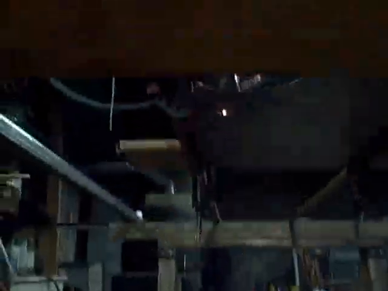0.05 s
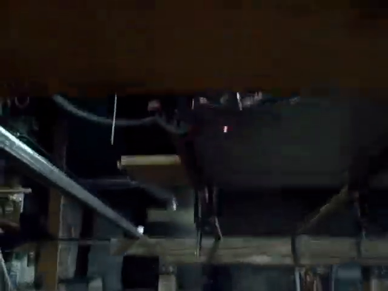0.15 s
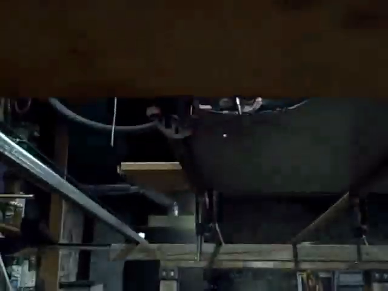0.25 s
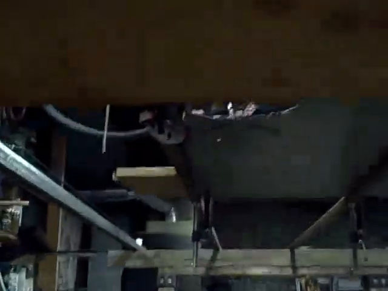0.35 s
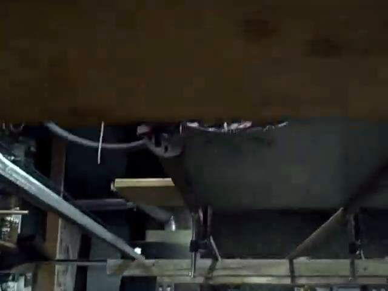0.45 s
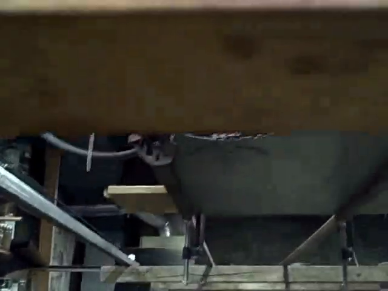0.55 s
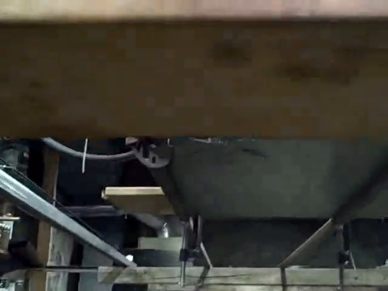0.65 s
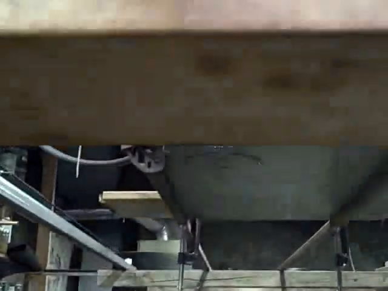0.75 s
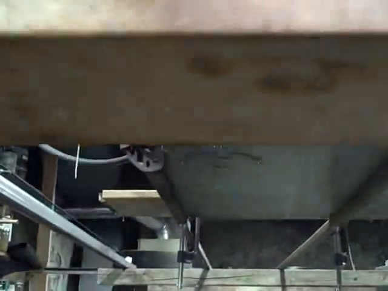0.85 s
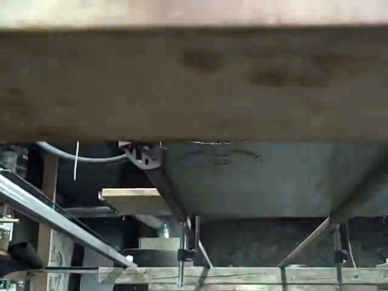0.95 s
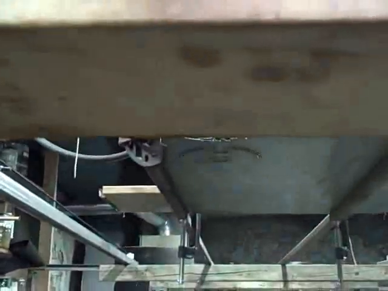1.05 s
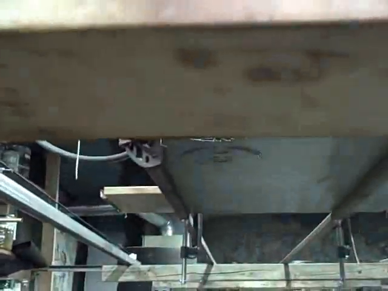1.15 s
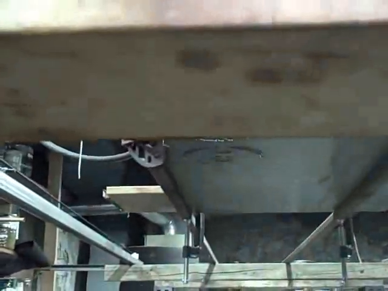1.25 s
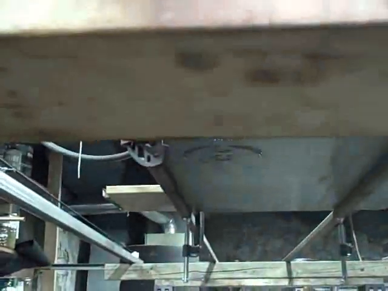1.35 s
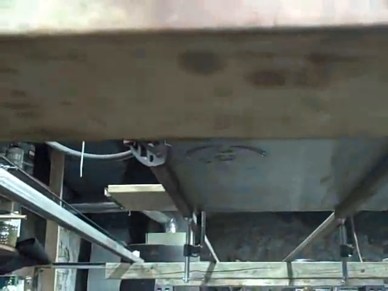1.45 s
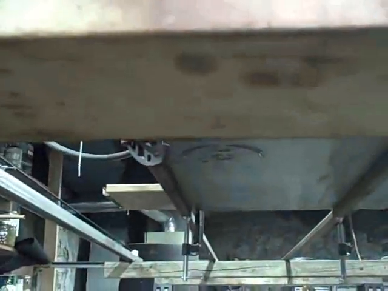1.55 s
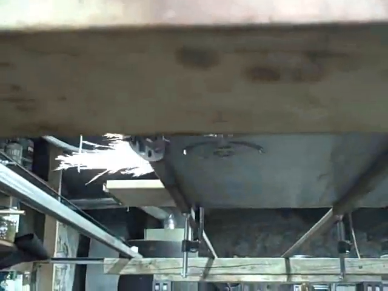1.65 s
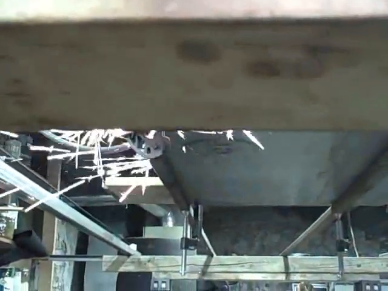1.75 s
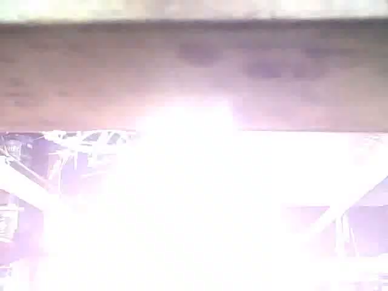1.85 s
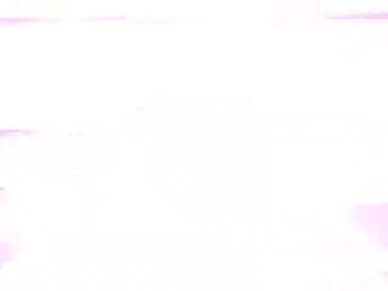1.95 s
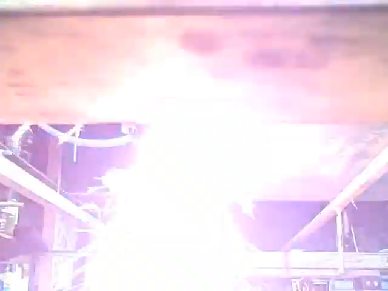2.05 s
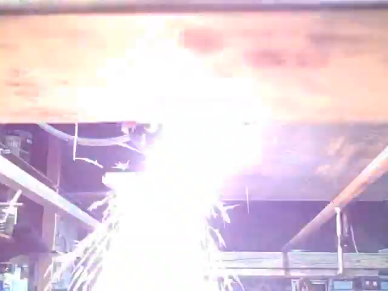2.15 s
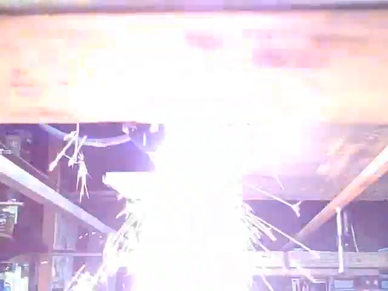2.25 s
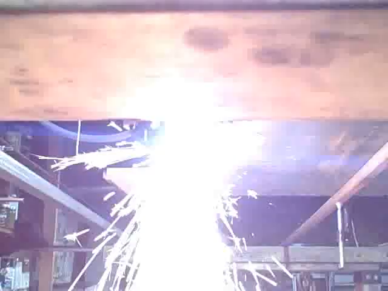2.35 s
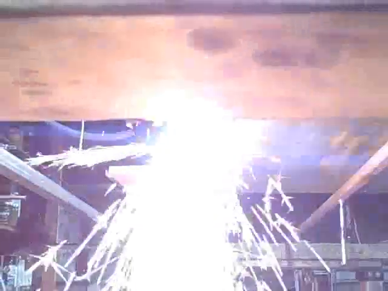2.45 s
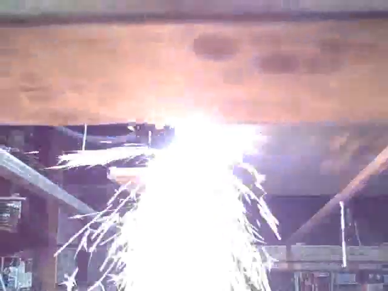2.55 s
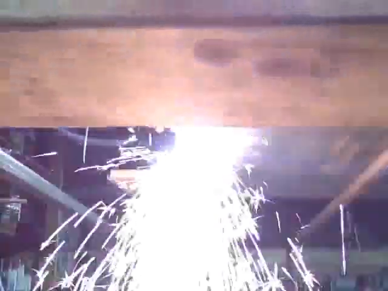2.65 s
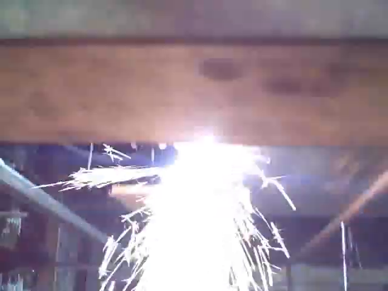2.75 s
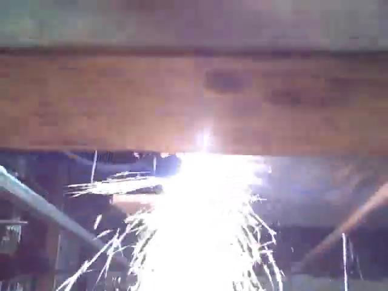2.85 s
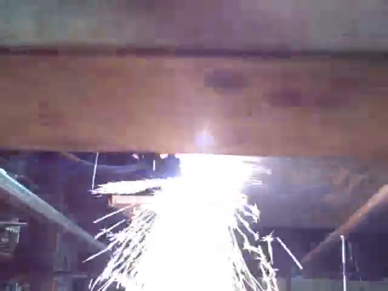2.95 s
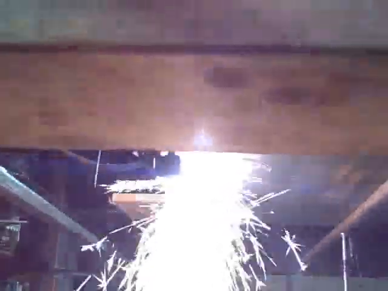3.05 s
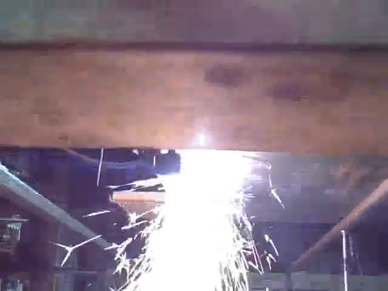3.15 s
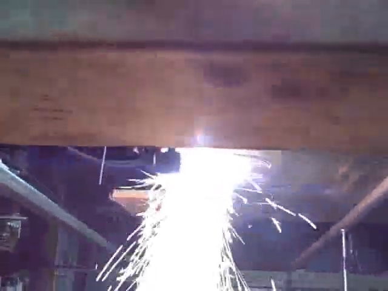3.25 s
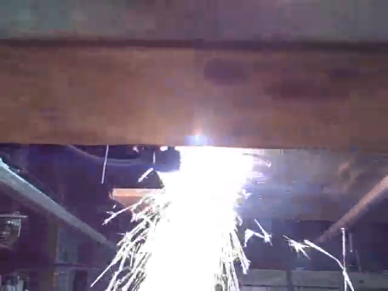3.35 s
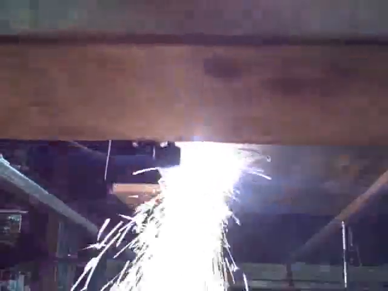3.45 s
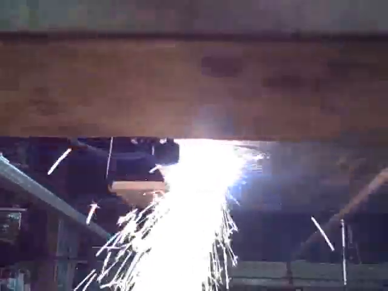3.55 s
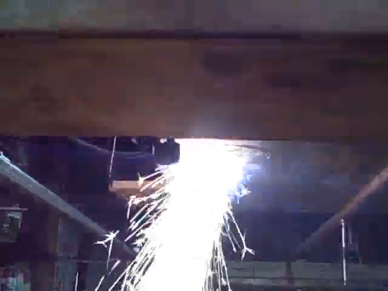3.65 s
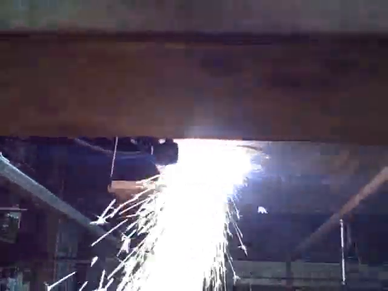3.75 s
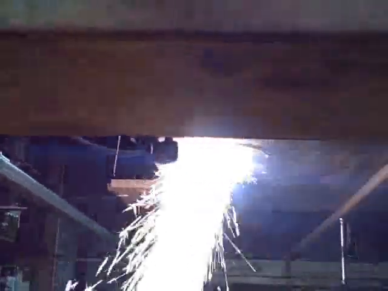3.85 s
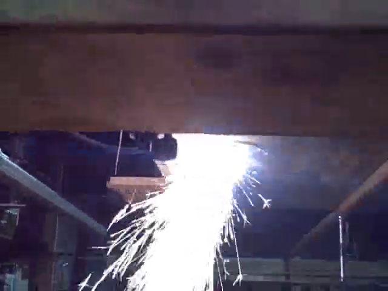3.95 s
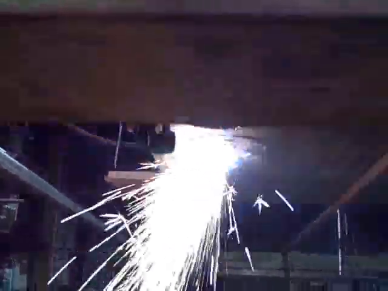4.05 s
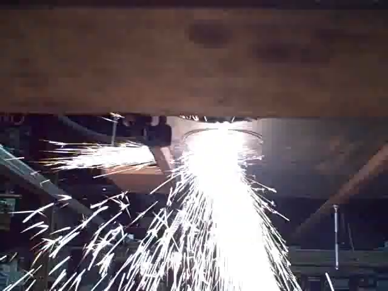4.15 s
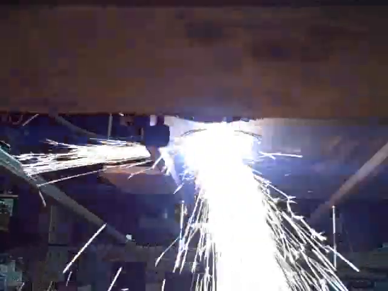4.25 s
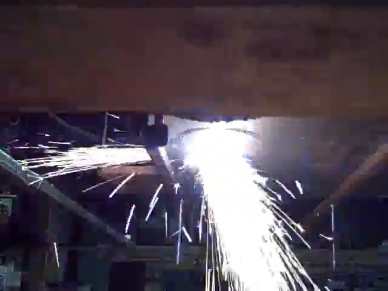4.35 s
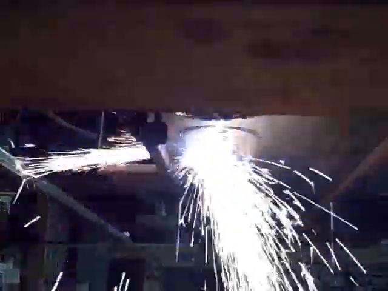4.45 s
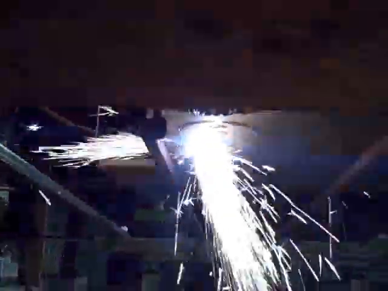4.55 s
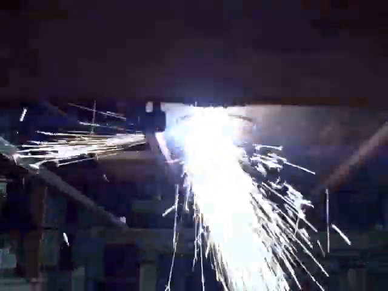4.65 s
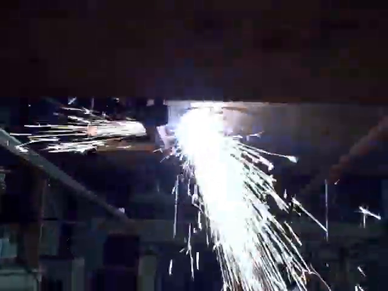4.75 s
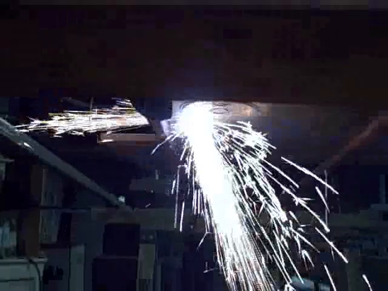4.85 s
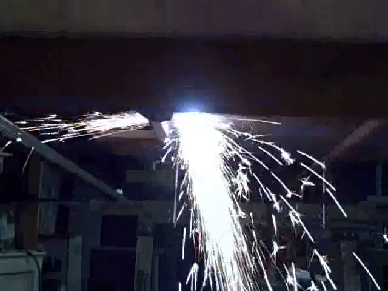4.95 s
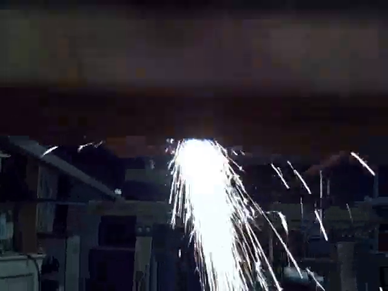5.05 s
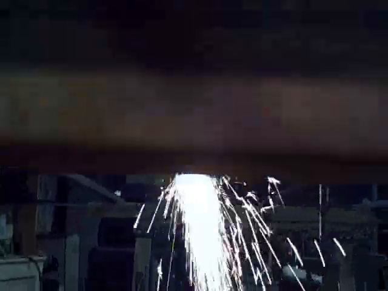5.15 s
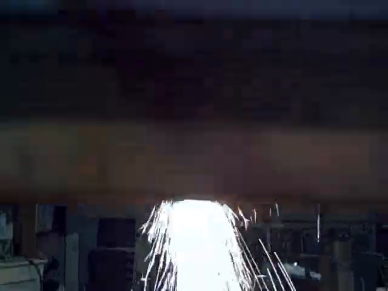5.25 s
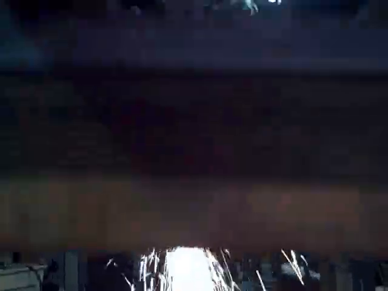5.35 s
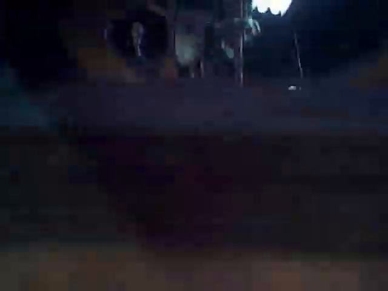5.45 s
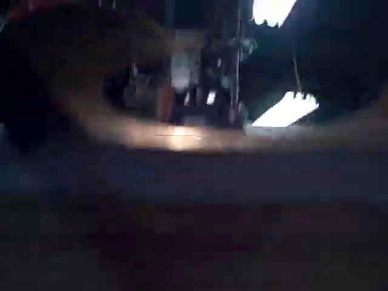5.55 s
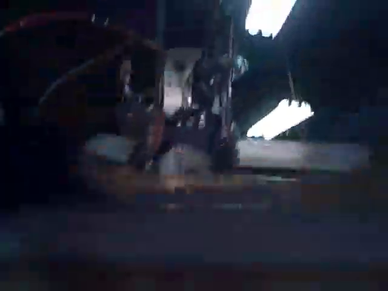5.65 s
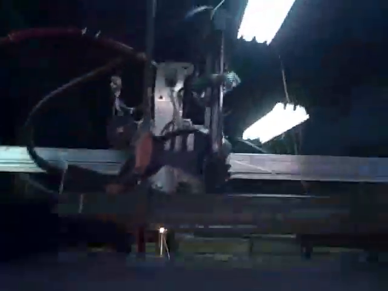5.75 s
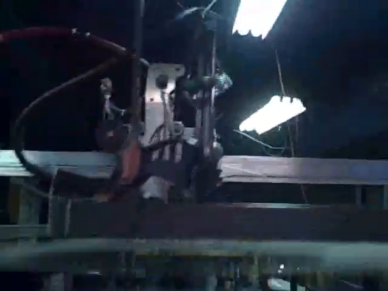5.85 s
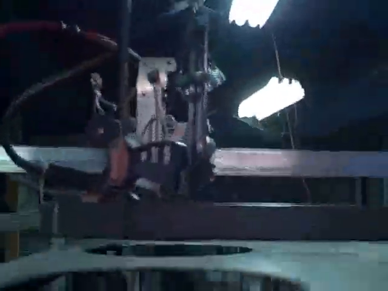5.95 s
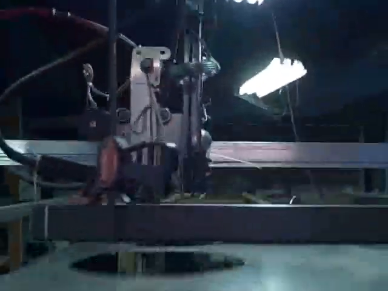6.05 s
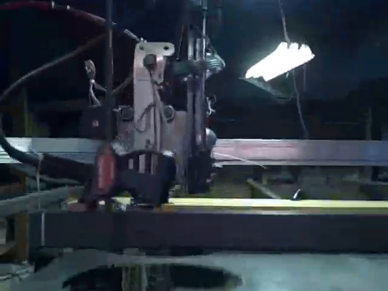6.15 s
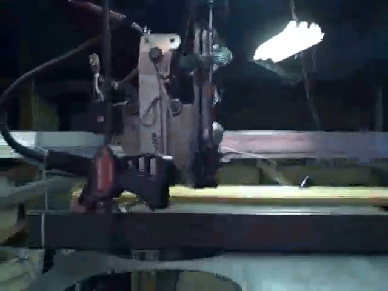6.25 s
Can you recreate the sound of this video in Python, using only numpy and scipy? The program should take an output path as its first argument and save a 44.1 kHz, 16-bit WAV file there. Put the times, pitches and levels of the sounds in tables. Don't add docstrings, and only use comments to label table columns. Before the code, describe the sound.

Compressed air hisses from an idle torch, dips, then a plasma arc strikes and roars harshly through sheet steel, with bumps on the microphone.

```python
import sys
import numpy as np
from scipy import signal
from scipy.fft import rfft, irfft, next_fast_len
from scipy.io import wavfile
from scipy.ndimage import uniform_filter1d

SR = 44100
rng = np.random.default_rng(int(sys.argv[2]) if len(sys.argv) > 2 else 0)


def voltage_ratio(level):
    return 10 ** (np.asarray(level, float) / 20)


def transcribe(u):
    v = np.clip(np.atleast_2d(u).T, -1, 1)
    q = np.round(v * 32767).astype(np.int16)
    wavfile.write(sys.argv[1], SR, q)


N = 278271

ROAR_HZ, BRIGHT_HZ = 1400, 4050
EDGE_HZ, TOP_HZ, END_HZ = 6000, 6375, 7300
CRUISE_DB = -30


def in_time(rows):
    s, *columns = np.transpose(rows)
    return [np.interp(np.arange(N) / SR, s, column) for column in columns]


def rms_one(x):
    return x / np.sqrt(np.mean(x ** 2) + 1e-20)


def shaped(x, points):
    hz, db = np.transpose(points)
    size = next_fast_len(N)
    bins = np.maximum(np.arange(size // 2 + 1) * SR / size, 1)
    gain = voltage_ratio(np.interp(np.log(bins), np.log(hz), db))
    return irfft(rfft(x, size) * gain, size)[:N]


def band(x, low_hz, high_hz):
    return shaped(x, [(low_hz - 1, -150), (low_hz, 0), (high_hz, 0), (high_hz + 1, -150)])


def drift(rate):
    r = np.exp(-80 * np.pi * rate / SR)
    white = rng.standard_normal(N // 40 + 2002)
    slow = signal.lfilter([1], [1, -2 * r, r * r], white)[2000:]
    return np.interp(np.arange(N) / 40, np.arange(len(slow)), rms_one(slow))


def gate(rows, fade_s):
    out = np.zeros(N)
    for s, length, *db in rows:
        start, end = max(round(s * SR), 0), round((s + length) * SR)
        out[start:end] = voltage_ratio(sum(db))
    fade = np.hanning(round(fade_s * SR))
    return signal.fftconvolve(out, fade / fade.sum(), "same")


def ringing(modes, swell_db):
    out, white = np.zeros(N), rng.standard_normal(N)
    for hz, width_hz, db in modes:
        r = np.exp(-np.pi * width_hz / SR)
        tone = signal.lfilter([1, 0, -1], [1, -2 * r * np.cos(2 * np.pi * hz / SR), r * r], white)
        out += voltage_ratio(db + swell_db * drift(2.1)) * rms_one(tone)
    return out


# (time [s], jet level [dB], brightness against the jet [dB])
TORCH_COURSE = [(0.0, -41, 7.5), (0.17, -44.5, 8.5), (0.55, -38, 6), (1.0, -39, 5.5), (1.335, -39, 7.5),
                (1.365, -32.5, 8.5), (1.475, -39, 12.5), (1.495, -45.5, 2), (1.56, -50, 8),
                (1.62, -41, -0.5), (1.71, -47, 6.5), (1.765, -42.5, 8.5), (1.785, -34.5, 5.5),
                (1.9, -32, 12.5), (2.0, -26.5, 10), (2.3, -22, 5.5), (2.9, -25.5, 5.5), (4.0, -27, 6),
                (5.1, -30, 4.5), (5.7, -27.5, 5), (5.84, -29.5, 9.5), (5.91, -35.5, 8.5), (6.03, -38, 10.5),
                (6.31, -34.5, 9)]
# (time [s], level [dB])
JET_MOMENTS = [(2.08, 0), (2.131, 3), (2.19, 0.5), (2.26, 3), (2.304, -3), (2.379, -7.5), (2.468, 2.5),
               (2.503, -3.5), (2.56, -2.5), (2.63, 3), (2.68, -1), (2.729, -5), (2.842, -1), (2.918, -2),
               (3.07, 1), (3.16, 1), (3.217, -1), (3.55, -0.5), (3.799, -4.5), (3.999, -4), (4.051, 3),
               (4.42, 1.5), (4.483, -0.5), (4.57, -1), (4.63, -2), (4.67, 1), (4.709, -4.5), (4.75, 2.5),
               (4.802, -2), (4.83, 2), (4.932, 0.5), (5.11, -2), (5.249, -0.5), (5.318, -6), (5.621, 4.5),
               (5.69, 6), (5.75, 2.5), (5.82, 3), (6.17, -2), (6.222, 1)]
# (time [s], level [dB])
KERF_OPENING = [(0, -5.5), (1.0, -3), (1.5, -1.6), (1.9, 0.1), (2.2, -2), (2.55, -1), (2.8, -1), (3.3, 2.1),
                (3.7, 1.5), (4.3, 0.5), (4.6, 0.4), (4.95, -0.2), (5.3, 1.5), (5.55, 0.8), (5.69, 3),
                (5.8, 1.5), (6.31, -1.5)]


def torch_levels():
    steady_db, bright_db = in_time(TORCH_COURSE)
    t = np.arange(N) / SR
    coarse = t[::32]
    moment_s = 0.014
    moments = sum(db * np.exp(-.5 * ((coarse - s) / moment_s) ** 2) for s, db in JET_MOMENTS)
    surges_per_s = 14
    surge_db = np.interp(t, coarse, moments) + 0.6 * drift(surges_per_s)
    jet_db = steady_db + surge_db
    roar_lag = 0.27
    roar_db = -5.5 + in_time(KERF_OPENING)[0] - roar_lag * (jet_db - CRUISE_DB)
    roar_db = roar_db + 0.35 * drift(surges_per_s)
    sizzle_db = steady_db + bright_db + 0.36 * surge_db + 1.22 * drift(6.4)
    return jet_db, roar_db, sizzle_db


# (frequency [Hz], density [dB per Hz])
JET_SPECTRUM = [(180, -33.5), (300, -8), (630, -3), (850, -5), (1500, -4.5), (1650, -5.5), (1800, -5),
                (2250, -6), (2700, -3.5), (3000, -3), (3250, -3.5), (3600, -2.5), (4050, -4.5)]
# (frequency [Hz], density [dB per Hz])
SIZZLE_SPECTRUM = [(4050, 2), (4200, -2), (4600, 2), (5200, 3), (5500, 1.5), (5750, 0.5), (5950, 3.5),
                   (6500, -8.5)]
# (frequency [Hz], width [Hz], level [dB])
TABLE_NOTCHES = [(1097, 70, -1.5), (1630, 70, -1), (2247, 110, -1), (3300, 110, -1), (4100, 130, -2.5)]


def jet(jet_db, roar_db, sizzle_db):
    sizes = voltage_ratio(4.0 * np.minimum(rng.exponential(1, N), 5)) * rng.choice([-1, 1], N)
    spatter = rms_one(sizes * (rng.random(N) < 1500 / SR))
    turbulence = voltage_ratio(0.59 * drift(25) + 1.0 * drift(60))
    gas = (rng.standard_normal(N) + .22 * spatter) * turbulence
    coloured = shaped(gas, JET_SPECTRUM)
    roar = voltage_ratio(roar_db - 0.5) * rms_one(band(coloured, 13, ROAR_HZ))
    body = rms_one(band(coloured, ROAR_HZ, BRIGHT_HZ)) + roar
    sizzle = rms_one(band(shaped(gas, SIZZLE_SPECTRUM), BRIGHT_HZ, TOP_HZ)) * voltage_ratio(.5 * drift(19))
    dips = []
    for hz, width, db in TABLE_NOTCHES:
        dips += [(hz - width, 0), (hz, db), (hz + width, 0)]
    return shaped(voltage_ratio(jet_db) * body + voltage_ratio(sizzle_db - 5.0) * sizzle, dips)


# (frequency [Hz], width [Hz], level under the jet [dB])
SHEET_MODES = [(639, 84, -21), (991, 38, -21.5), (1174.5, 43, -22.5), (1508, 18, -19), (1783, 65, -19.5),
               (2051, 52, -20.5), (2627, 130, -18), (2987, 7.9, -31), (3770, 15, -21.5), (4250, 26, -36),
               (5860, 660, -23.5)]


def plate(jet_db):
    return voltage_ratio(jet_db) * ringing(SHEET_MODES, swell_db=1.5)


# (frequency [Hz], density [dB per Hz])
ROOM_RUMBLE = [(11, -43), (22, 1.5), (45, -10.5), (68, -4), (100, -6.5), (230, -6.5), (320, -8.5),
               (700, -16), (1300, -19), (2000, -26.5), (3300, -41.5)]
# (frequency [Hz], width [Hz], level under the rumble [dB])
FAN_HUM = [(67, 8, -10.5), (120, 8, -16), (237, 8, -10)]


def workshop(jet_db):
    ducked_s, recover_s = 0.24, 0.35
    since = np.abs(np.arange(N) / SR - ducked_s)
    ducking_db = -7 * np.exp(-since / recover_s)
    shop_db = -34.5 + 0.075 * (jet_db - CRUISE_DB) + ducking_db + 1.67 * drift(6.0)
    rumble = rms_one(shaped(rng.standard_normal(N), ROOM_RUMBLE))
    return voltage_ratio(shop_db) * (rumble + ringing(FAN_HUM, swell_db=0.5))


# (time [s], level [dB], swing [Hz])
CAMERA_BUMPS = [
    (5.118, -24, 26.3),
    (5.37, -22.5, 26.9),
    (5.632, -23.5, 26.5),
    (5.96, -30.5, 25.9),
    (6.19, -43.5, 25.5),
]


def bumps():
    out, t = np.zeros(N), np.arange(round(.11 * SR)) / SR
    for s, db, hz in CAMERA_BUMPS:
        at = round(s * SR)
        swing = voltage_ratio(db) * np.hanning(len(t)) * np.sin(2 * np.pi * hz * t)
        out[at:at + len(t)] += swing[:N - at]
    return out


def scene():
    jet_db, roar_db, sizzle_db = torch_levels()
    mix = jet(jet_db, roar_db, sizzle_db) + plate(jet_db) + workshop(jet_db) + bumps()
    return mix[None]


# (frequency [Hz], step [rms])
ROUNDING_STEP = [(15, .4), (250, 1.0), (500, 1.7), (900, 2.3), (1800, 2.55), (4000, 2.8), (4300, 1.9),
                 (6400, 1.9)]
# (frequency [Hz], share [ratio])
LOSS_SHARE = [(150, .3), (750, .5), (1100, .58), (1400, .46), (1650, .6), (1900, .48), (2250, .72),
              (2600, .48), (3000, .55), (3300, .72), (3600, .55), (4050, .82), (4400, .7), (4500, .4),
              (6400, .4)]


def sparse_lines(x):
    frame, count = 1411, 410
    n = np.arange(2 * frame)[:, None]
    line = np.arange(count) + .5
    hz = line * SR / 2 / frame
    window = np.sin(np.pi * (n + .5) / 2 / frame)
    basis = window * np.cos(np.pi / frame * (n + .5 + frame / 2) * line)
    padded = np.r_[np.zeros(frame), x, np.zeros(2 * frame)]
    frames = np.lib.stride_tricks.sliding_window_view(padded, 2 * frame)[::frame]
    lines = frames @ basis
    around = uniform_filter1d(uniform_filter1d(lines ** 2, size=40, axis=1), size=3, axis=0)
    step = np.interp(hz, *np.transpose(ROUNDING_STEP))
    luck = signal.lfilter([.95], [1, -.25], rng.standard_normal((len(frames), count // 5)), axis=0)
    unit = step * np.repeat(voltage_ratio(2.0 * luck), 5, axis=1) * np.sqrt(np.abs(around) + 1e-12)
    groups = np.repeat((lines ** 2).reshape(len(frames), -1, 10).mean(axis=2), 10, axis=1)
    usual = groups / (uniform_filter1d(groups, size=21, axis=0) + 1e-18)
    limit = np.interp(hz, *np.transpose(LOSS_SHARE)) * uniform_filter1d(usual, size=90, axis=1)
    kept = (usual > limit) & np.roll(usual > .5 * limit, 1, axis=0)
    parts = kept * unit * np.round(lines / unit) @ basis.T * 2 / frame
    out = np.zeros((len(frames) + 1, frame))
    out[:-1] += parts[:, :frame]
    out[1:] += parts[:, frame:]
    return out.ravel()[frame:frame + N]


# (start [s], length [s], level [dB])
JET_FREE = [
    (2.13, 0.056, 0.5),
    (2.41, 0.079, 2),
    (3.52, 0.086, 1),
    (4.05, 0.086, 1),
    (4.56, 0.057, 2.5),
    (4.66, .17, 3),
    (5.44, .04, 2.5),
    (5.72, 0.11, 1.5),
]
# (start [s], length [s], level
# [dB])
BRIGHT_DULLED = [(0.113, 0.033, -12), (0.192, 0.069, -3), (0.28, 0.046, -7), (0.492, 0.036, -14),
                 (0.615, 0.016, -3), (0.687, 0.02, -14), (0.755, 0.024, -6.7), (0.903, 0.018, -8),
                 (0.96, 0.018, -8), (1.078, 0.047, -11), (1.157, 0.029, -9.1), (1.25, 0.11, -11),
                 (1.471, 0.12, -11), (1.628, 0.036, -8), (1.684, 0.13, -5), (1.838, 0.064, -2),
                 (1.904, 0.042, -6.0), (2.371, 0.024, -4), (2.494, 0.025, -10), (2.594, 0.022, -6),
                 (2.685, 0.015, -7.0), (2.798, 0.038, -11)]
# (start [s], length [s], level [dB])
DULLED_LATE = [(3.1, 0.014, -11), (3.17, 0.022, -10), (3.213, 0.026, -17), (3.364, 0.065, -5),
               (3.436, 0.04, -8), (3.75, 0.028, -8), (3.828, 0.016, -12), (3.915, 0.018, -10),
               (3.985, 0.063, -7.5), (4.15, 0.017, -1), (4.173, 0.02, -4.2), (4.204, 0.041, -9),
               (4.334, 0.021, -10), (4.395, 0.039, -6), (4.459, 0.021, -10), (4.52, 0.037, -15),
               (4.633, 0.02, -3), (4.793, 0.016, 2), (4.842, 0.039, -6.1), (4.903, 0.035, -3),
               (5.121, 0.037, -7), (5.166, 0.06, -14), (5.256, 0.018, -16), (5.34, 0.036, -8),
               (5.393, 0.053, -10), (5.486, 0.024, -11), (5.615, 0.092, -10), (5.85, 0.067, -9),
               (5.95, 0.069, -13), (6.047, 0.028, -11), (6.162, 0.024, -8.3), (6.21, 0.031, -11)]


def bright_band(heard):
    changes = [*JET_FREE, *BRIGHT_DULLED, *DULLED_LATE]
    left = 1 - gate([row[:2] for row in changes], .01) + gate(changes, .01)
    out = np.zeros(N)
    for low, high in [(BRIGHT_HZ, 4600), (4600, 5300), (5300, EDGE_HZ)]:
        out += band(heard, low, high) * voltage_ratio(1.3 * drift(18) - .4)
    return out * left


# (start [s], length [s], level [dB])
TOP_FILLS = [(0.0, 0.016, -37.5), (0.04, 0.032, -45), (0.076, 0.036, -48), (0.112, 0.037, -36.5),
             (0.136, 0.016, -44), (0.172, 0.028, -44.6), (0.2, 0.052, -37.2), (0.251, 0.012, -40),
             (0.295, 0.018, -41), (0.311, 0.019, -33), (0.335, 0.016, -39), (0.487, 0.033, -32.5),
             (0.523, 0.014, -39), (0.563, 0.036, -35), (0.647, 0.016, -36), (0.662, 0.047, -32),
             (0.742, 0.035, -36), (0.782, 0.06, -40.7), (0.906, 0.024, -37), (0.93, 0.016, -53),
             (0.946, 0.034, -35), (1.034, 0.029, -37.1), (1.07, 0.124, -32), (1.225, 0.032, -37),
             (1.261, 0.078, -31.9), (1.365, 0.011, -47), (1.385, 0.035, -37.5), (1.449, 0.06, -39.5),
             (1.509, 0.032, -52), (1.592, 0.075, -47.5), (1.684, 0.021, -47), (1.748, 0.012, -41),
             (1.799, 0.052, -25.5), (1.928, 0.021, -26.8), (1.947, 0.016, -38), (2.01, 0.016, -19),
             (2.013, 0.024, -16), (2.038, 0.019, -40), (2.084, 0.029, -53), (2.163, 0.019, -55),
             (2.191, 0.023, -58), (2.246, 0.018, -45), (2.342, 0.048, -47), (2.477, 0.016, -25),
             (2.486, 0.052, -22.5), (2.51, 0.011, -22.5), (2.669, 0.016, -20), (2.683, 0.02, -16.5),
             (2.695, 0.0088, -21.5), (2.762, 0.032, -38), (2.8, 0.04, -21.5), (2.817, 0.013, -30),
             (2.874, 0.022, -36), (2.901, 0.012, -44), (2.965, 0.01, -41), (3.047, 0.032, -30.5),
             (3.095, 0.04, -24.5), (3.168, 0.013, -30.5), (3.173, 0.028, -23), (3.203, 0.013, -36.5),
             (3.216, 0.024, -27), (3.256, 0.16, -32.5), (3.401, 0.035, -27.5), (3.442, 0.056, -23.5),
             (3.497, 0.016, -27.5), (3.567, 0.042, -25.5), (3.645, 0.028, -17.5), (3.651, 0.018, -28.5),
             (3.678, 0.013, -36), (3.727, 0.016, -29), (3.745, 0.02, -19.5), (3.757, 0.024, -22.5),
             (3.799, 0.032, -32), (3.833, 0.028, -22.5), (3.919, 0.014, -21), (3.977, 0.024, -27),
             (4.008, 0.02, -39), (4.016, 0.026, -24.0), (4.049, 0.016, -30), (4.099, 0.02, -49),
             (4.205, 0.03, -28.5), (4.207, 0.024, -24.3), (4.236, 0.016, -31), (4.265, 0.016, -37),
               (4.273, 0.021, -27.5), (4.332, 0.024, -26), (4.39, 0.056, -34), (4.462, 0.021, -29.5),
               (4.505, 0.063, -25.5), (4.652, 0.021, -25), (4.825, 0.076, -23.5), (4.861, 0.011, -37.5),
               (5.049, 0.025, -27.5), (5.112, 0.014, -32.5), (5.117, 0.108, -26), (5.226, 0.016, -39),
               (5.255, 0.016, -33), (5.269, 0.012, -25.5), (5.337, 0.018, -27.5), (5.349, 0.18, -28.5),
               (5.571, 0.085, -28.3), (5.66, 0.053, -23.5), (5.72, 0.044, -29), (5.786, 0.02, -37),
               (5.79, 0.034, -27.2), (5.849, 0.059, -31), (5.947, 0.055, -30.6), (6.006, 0.044, -40),
               (6.05, 0.04, -33), (6.094, 0.036, -43), (6.156, 0.02, -29), (6.179, 0.073, -28.6),
               (6.22, 0.049, -22), (6.236, 0.013, -42)]


def flickering_top(heard):
    fills = TOP_FILLS
    filling = gate([row[:2] for row in fills], .017)
    chance = .7 + .3 * filling + drift(12)
    edge = band(heard, EDGE_HZ, TOP_HZ) * (voltage_ratio(-4) * np.clip(3 * chance, 0, 1) + voltage_ratio(-26))
    noise = rms_one(band(rng.standard_normal(N), TOP_HZ, END_HZ))
    top = noise * voltage_ratio(0.8 * drift(50) + 0.4 * drift(16.0)) * gate(fills, 0.012)
    return edge + voltage_ratio(-1.5) * top


# (frequency [Hz], density [dB per Hz])
FIZZ_SPECTRUM = [(400, -17), (3700, -12), (4200, 5), (6000, -8), (6500, -15), (8000, -2.5), (8001, -150)]


def converter_fizz():
    follows = 0.9
    fizz_db = follows * (sum(in_time(TORCH_COURSE)) - CRUISE_DB) - 39 + 3.5 * drift(24.0)
    return rms_one(shaped(rng.standard_normal(N), FIZZ_SPECTRUM)) * voltage_ratio(fizz_db - 5.0)


# (frequency [Hz], gain [dB])
PLAYBACK_FILTER = [(7300, -0.5), (7900, -15), (8400, -21), (8750, -25), (9200, -49.5), (9500, -67.5),
                   (9800, -100)]


def playback(camera):
    mirror = camera * 2 * np.cos(2 * np.pi * 16000 * np.arange(N) / SR)
    return shaped(camera + mirror, PLAYBACK_FILTER)


def roll_off(x):
    return signal.sosfilt(signal.butter(12, 9340, fs=SR, output="sos"), x)


def record(dry):
    bass_hz = 150
    heard = sparse_lines(band(dry[0], bass_hz, END_HZ)) + band(dry[0], 10, bass_hz)
    camera = band(heard, 10, BRIGHT_HZ) + bright_band(heard) + flickering_top(heard) + converter_fizz()
    mix = playback(camera)[None]
    return roll_off(mix)


dry = scene()
out = record(dry)
transcribe(out)
```